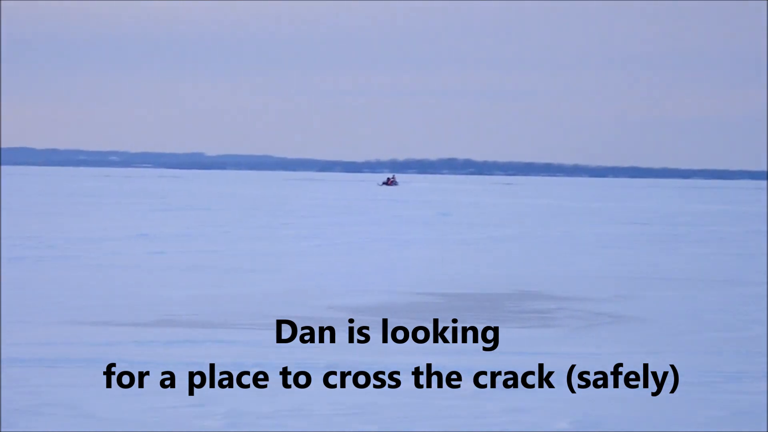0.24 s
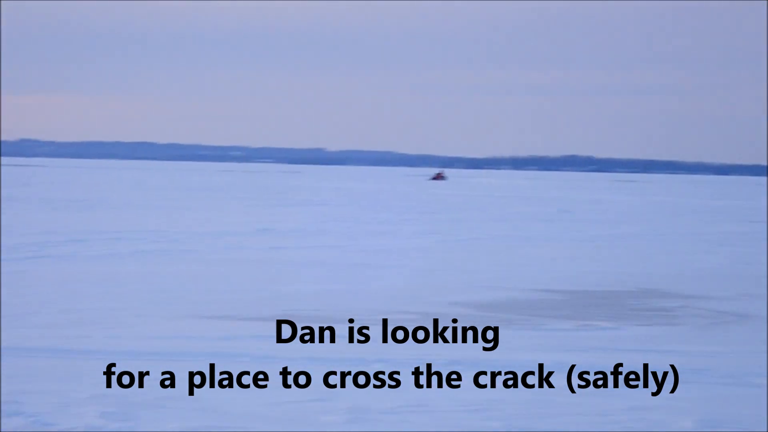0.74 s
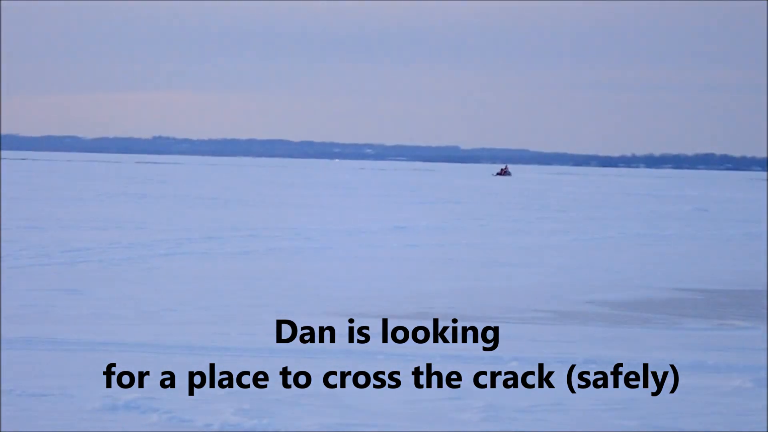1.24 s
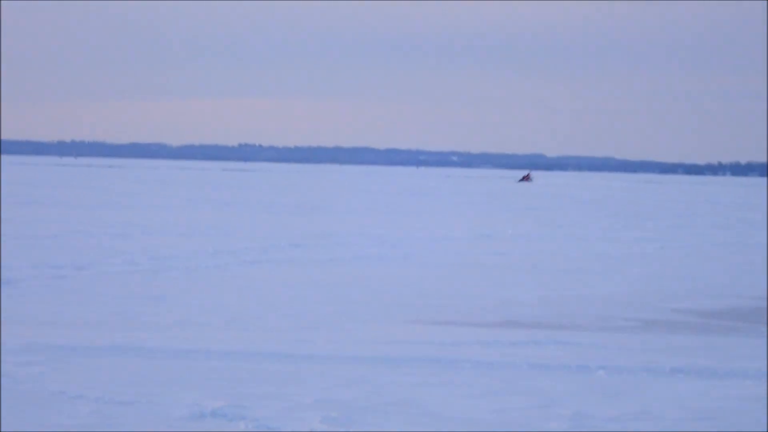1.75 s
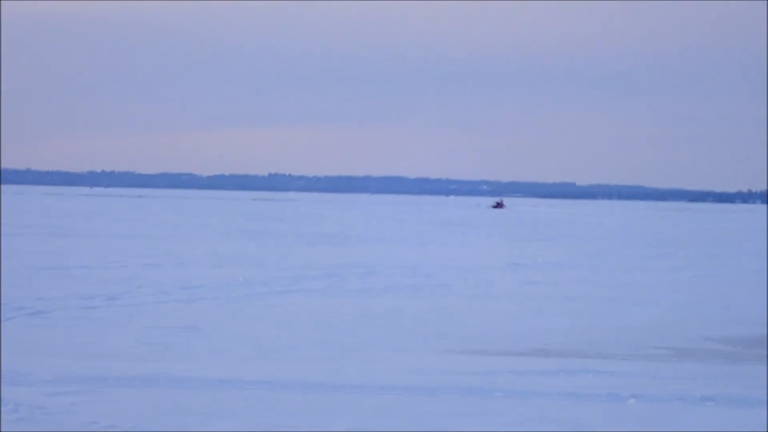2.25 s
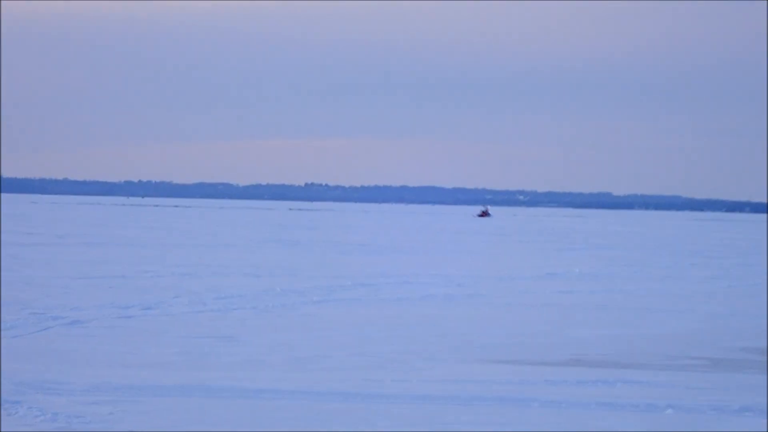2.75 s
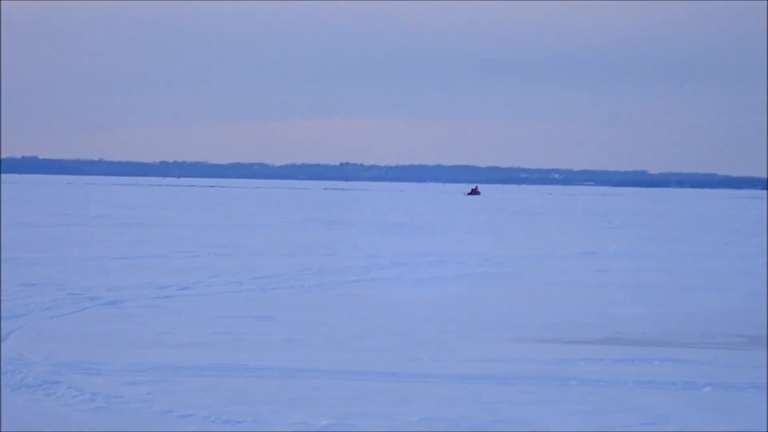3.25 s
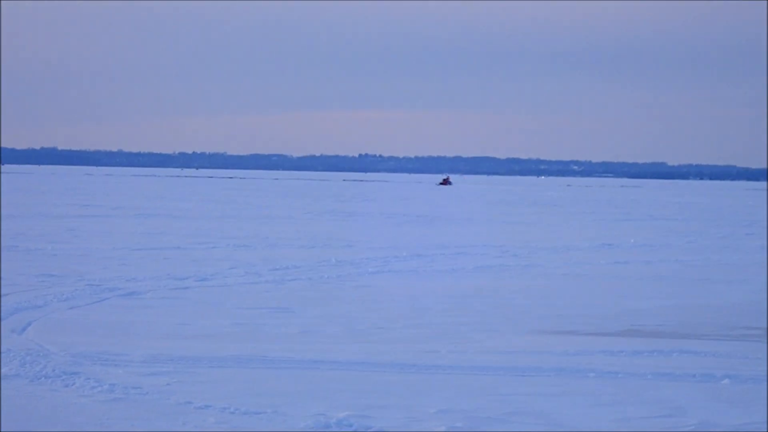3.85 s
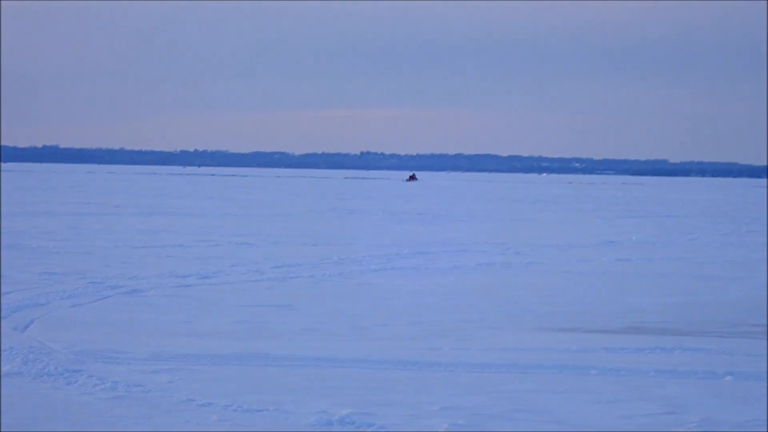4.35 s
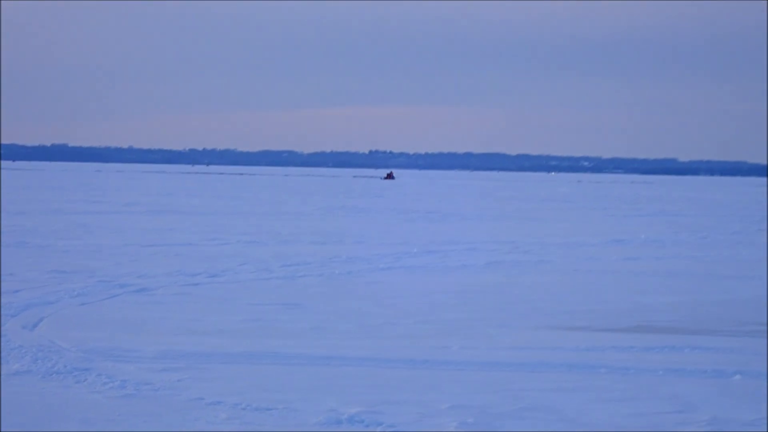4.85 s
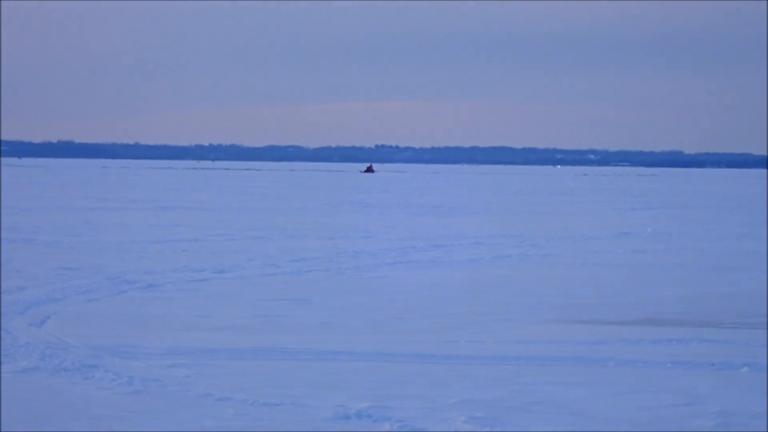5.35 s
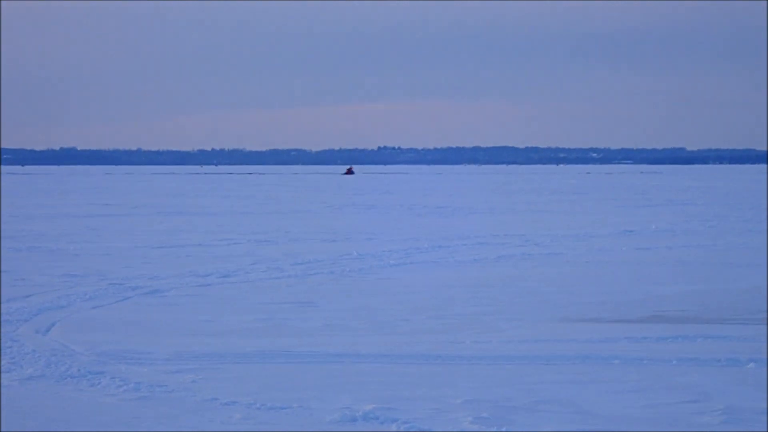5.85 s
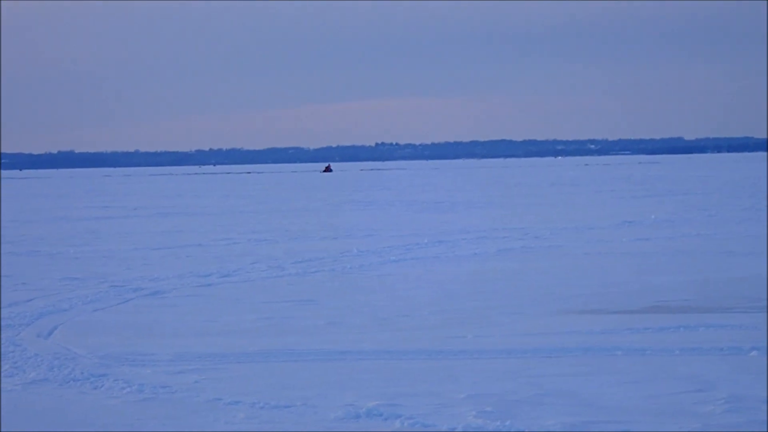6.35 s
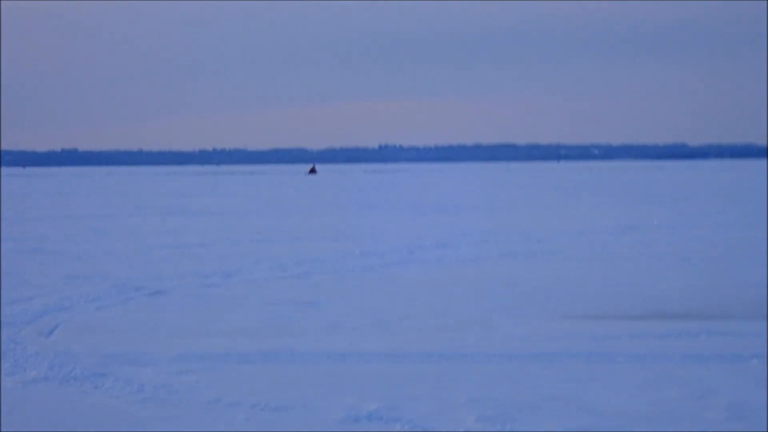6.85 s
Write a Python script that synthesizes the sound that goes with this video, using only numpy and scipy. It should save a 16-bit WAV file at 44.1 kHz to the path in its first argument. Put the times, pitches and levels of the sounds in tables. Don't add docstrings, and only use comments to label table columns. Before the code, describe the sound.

For the full seven seconds a two-stroke snowmobile engine idles close to a stereo microphone on open ice, slightly left of centre. It is already running at the start and never revs, moves away or stops. Rapid uneven pops, roughly two dozen a second, crack sharply from the exhaust, ringing the pipe and rattling the cowl; weaker puffs and coughs fall between them. Beneath lies a steady low drone with a buzzing hum near 117 Hz. Fan and intake hiss pulses over it, strongest at first, easing gradually until about 3.5 seconds, then holding. Low wind thumps bump the microphone from 0.2 to 0.9 seconds, again near 4.1, and more lightly around 6. Tiny dry ticks from dropped samples recur in bursts throughout, some sharper, as around 1.6, 2.6 and 4.9 seconds. The sound is dry, loud and close, ending with the idle still running.

```python
import sys
import numpy as np
from scipy import signal
from scipy.fft import rfft, irfft, next_fast_len
from scipy.io import wavfile
from scipy.ndimage import uniform_filter1d, map_coordinates

SR = 44100
rng = np.random.default_rng(int(sys.argv[2]) if len(sys.argv) > 2 else 0)


def voltage_ratio(decibels):
    exponent = np.asarray(decibels, float) / 20
    return 10 ** exponent


def int16_out(signal):
    q = np.round(np.clip(np.atleast_2d(signal).T, -1, 1) * 32767)
    wavfile.write(sys.argv[1], SR, q.astype(np.int16))


N = 312669

PORTS_HZ = 117.5
# time in seconds, turns so far.
CRANK_TURNS = [(.007, 0), (.5399, 21), (.9762, 38), (1.4933, 58), (1.8979, 74), (2.3338, 91), (2.8944, 113),
               (3.1513, 123), (3.6309, 142), (3.7042, 145), (5.0866, 200), (5.6454, 222), (6.0005, 236),
               (6.4042, 252), (6.5286, 257), (7.0814, 279)]


def unit(x):
    return x / np.sqrt(np.mean(x ** 2) + 1e-20)


def along(points, hz):
    f, v = np.transpose(points)
    return np.interp(np.log(hz + 1), np.log(f + 1), v)


def wobble(rate):
    knots = rng.standard_normal(int(N * rate / SR) + 4)
    return map_coordinates(knots, [np.arange(N) * rate / SR])


def filtered(x, response):
    m = next_fast_len(N + SR // 2)
    return irfft(rfft(x, m) * response(np.fft.rfftfreq(m, 1 / SR)), m)[..., :N]


def late(hz, ms):
    return np.exp(-2j * np.pi * hz * ms / 1000)


def resonance(hz, centre, width):
    return 1j * hz * width / (centre * centre - hz * hz + 1j * hz * width)


def rush(spectrum, gate=1, alike=None):
    # frequency in Hz, left-right likeness from 0 to 1.
    usual_likeness = [(60, 1), (150, 0.97), (1000, 0.99), (2000, 0.74), (4000, 1), (8000, 0.063)]
    likeness = usual_likeness if alike is None else alike
    shut = [(spectrum[0][0] * .7, -120), *spectrum, (spectrum[-1][0] * 1.4, -120)]

    def colour(hz):
        turn = np.arccos(np.clip(along(likeness, hz), -1, 1)) / 2
        return voltage_ratio(along(shut, hz)) * [np.cos(turn), np.sin(turn)]

    mid, side = filtered(gate * rng.standard_normal((2, N)), colour)
    return unit(np.array([mid + side, mid - side]))


def dying(blows, t60, rise):
    t = np.arange(SR // 5) / SR
    decay = voltage_ratio(-60 * t / t60) * (1 - np.exp(-t / rise))
    return np.abs(signal.fftconvolve(blows, decay)[:N])


def clock(turns):
    s, done = np.transpose(CRANK_TURNS)
    per_second = PORTS_HZ / 3
    return np.interp(turns, np.r_[-per_second, done, done[-1] + per_second], np.r_[s[0] - 1, s, s[-1] + 1])


def turns_at(s):
    turns = np.arange(-3, CRANK_TURNS[-1][1] + 4)
    return np.interp(s, clock(turns), turns)


def rich_waits(usual):
    # start in seconds, length in seconds, turns waited.
    spells = [(.16, 0, 2), (.363, 0, 2), (.643, 0, 1), (1.131, .104, 2), (1.364, 0, 2), (3.1, 0, 4),
              (3.353, .203, 2), (3.68, .05, 2), (4.459, 0, 4), (4.71, .1, 2), (5.24, 0, 2), (5.823, .05, 2),
              (6.227, .102, 2), (6.605, 0, 2), (6.729, 0, 2)]
    waits = [0]
    while sum(waits) < CRANK_TURNS[-1][1]:
        now = clock(sum(waits))
        inside = (w for s, length, w in spells if s - .01 < now < s + length + .01)
        waits.append(next(inside, usual))
    return waits


def burns():
    second_waits = [0, 5, 4, 4, 5, 5, 7, 5, 6, 4, 4, 2, 6, 4, 4, 3, 6, 3, 3, 6, 4, 5, 6, 3, 4, 11, 3, 5, 5,
                    4, 3, 5, 5, 8, 5, 4, 6, 5, 5, 4, 6, 5, 4, 6, 4, 5, 5, 7, 8, 5, 5, 3, 4, 6, 5, 6, 5]
    third_waits = [2, 4, 5, 3, 5, 5, 5, 4, 4, 9, 6, 6, 5, 5, 6, 4, 6, 6, 6, 7, 5, 7, 4, 7, 5, 6, 6, 7, 4, 3,
                   5, 5, 6, 7, 5, 4, 3, 5, 1, 5, 5, 8, 4, 5, 3, 6, 6, 3, 5, 6, 6, 7, 5, 6]
    # blast in dB, shock front in dB, dB lost when the next comes a turn early, ms late.
    full_burns = [
        (-5.5, -24.5, 6, 0.0088),
        (-6.5, -22, 3.5, 0.37),
        (-6.5, -29.5, 2.6, 0.35),
    ]
    # time in seconds, extra strength in dB.
    odd_burns = [(.285, 2), (.899, -3), (.473, 1), (1.493, 4.5), (1.678, -7), (1.797, -3.5), (2.334, -4),
                 (2.776, -10), (2.784, 3), (3.403, 4.5), (3.488, 2.5), (3.505, 0), (3.688, -3),
                 (3.855, -2.5), (4.014, -8), (4.156, -0.5), (4.517, 3.5), (4.727, 0.5), (4.76, 3.5),
                 (5.18, 0.5), (5.612, -9), (5.873, -11), (6.261, 5.5), (6.278, -7), (6.32, 2), (6.621, 0),
                 (6.729, 0.5)]
    rich_wait, lean_wait = 3, 5
    blast_follows, warms_db_per_s = 0.34, 0.24
    blast_scatter_db, shock_scatter_db = 0.73, -1.5

    blows, shocks = np.zeros((2, 3, N))
    odd_s, odd_db = np.transpose(odd_burns)
    cylinders = [(rich_waits(rich_wait), rich_wait), (second_waits, lean_wait), (third_waits, lean_wait)]
    for c, (waits, usual) in enumerate(cylinders):
        blast_db, shock_db, early_db, ms = full_burns[c]
        s = clock(np.cumsum(waits) + c / 3) + ms / 1000
        early = np.clip(usual - np.r_[waits[1:], usual], 0, None)
        odd = (np.abs(s[:, None] - odd_s) < .004) @ odd_db
        strength_db = odd - early_db * early ** 1.4 + warms_db_per_s * (s - N / SR / 2)
        chance = rng.standard_normal((len(s), 2))
        at = np.round(s * SR).astype(int)
        blows[c, at] = voltage_ratio(blast_db + blast_follows * strength_db + blast_scatter_db * chance[:, 0])
        shocks[c, at] = voltage_ratio(shock_db + strength_db + shock_scatter_db * chance[:, 1])
    return blows, shocks


def add_puffs(blows, shocks):
    # time in seconds, blast in dB.
    half_lit = [(.702, -11.5), (.737, -19), (1.105, -18), (1.847, -14), (2.163, -10.5), (2.546, -15.5),
                (2.851, -17), (2.911, -14), (2.98, -12.5), (3.006, -25), (3.168, -15), (3.194, -11.5),
                (3.797, -11), (3.989, -15), (4.986, -18), (5.223, -9.5), (5.88, -15.5), (5.942, -10.5),
                (6.068, -14), (6.303, -15), (6.746, -14.5), (6.814, -15.5), (6.964, -19)]
    front_db = -30.5
    for s, db in half_lit:
        port = round(3 * turns_at(s))
        at = port % 3, round(clock(port / 3) * SR)
        blows[at], shocks[at] = voltage_ratio(db), voltage_ratio(db + front_db)


def misfires(blows, angle, level_db=-29):
    port = np.floor(angle * 3 / (2 * np.pi)).astype(int)
    at = np.flatnonzero(np.diff(port)) + 1
    coughs = np.zeros((3, N))
    coughs[port[at] % 3, at] = voltage_ratio(level_db + 6 * rng.standard_normal(len(at)))
    no_burn_near = uniform_filter1d(blows.sum(0), size=199) < 1e-6
    return coughs * no_burn_near


def reflections(hz):
    # delay in ms, share of the blast, and so on for three returns.
    header_returns = [(3.31, 0.59, 11.85, 0.86, 24.02, -0.39), (3.68, 0.78, 12.4, 0.59, 23.4, 0.42),
                      (3.11, 0.82, 12.01, 0.99, 23.48, 0.43)]
    returns = [sum(share * late(hz, ms) for ms, share in np.reshape(row, (-1, 2))) for row in header_returns]
    return 1 + np.array(returns)


def exhaust(blows, blast_hz=1160, level_db=23.0):
    # mode in Hz, width in Hz, coupling to cylinders 1, 2 and 3.
    pipe_modes = [(135, 18, -1.67, 2.06, 1.51), (166, 19, 11.5, 6.01, 10.79), (202, 18, -0.89, 6.37, 6.74),
                  (232, 28, -4.04, -3.64, -5.07), (306, 104, 2.52, 1.27, 2.22),
                  (439, 76, 8.11, 3.21, 12.68), (468, 188, -6.89, -2.88, -7.86),
                  (620, 315, 2.47, 2.75, 2.31), (774, 21, 3.81, 4.3, 3.32), (903, 18, 0.79, -1.11, 4.84),
                  (1121, 49, -1.24, 0.58, -5.26), (1269, 45, -1.73, -7.43, -1.63),
                  (1695, 850, -1.48, -1.7, -1.67)]

    def pop(hz):
        modes = sum(np.c_[to] * c * w / (c * c - hz * hz + 1j * hz * w) for c, w, *to in pipe_modes)
        return (modes - reflections(hz)) * np.exp(-(hz / blast_hz) ** 2) * late(hz, .55)

    pops = voltage_ratio(level_db) * filtered(blows, pop).sum(0)
    return filtered(pops, lambda hz: hz ** 4 / (hz ** 4 + 70 ** 4))


def shock(shocks, level_db=21):
    # frequency in Hz, width in Hz, level in dB.
    outlet_modes = [(1630, 470, -1), (2433, 76, 3), (2474, 470, 3), (3725, 390, 16.5), (3790, 367, 16.5),
                    (5130, 880, -3)]

    def strike(hz):
        ring = sum((-1) ** k * voltage_ratio(db) * resonance(hz, c, w) for k, (c, w, db) in enumerate(outlet_modes))
        returns = 1 + 0.31 * (reflections(hz) - 1) + 0.04 * late(hz, 2.295)
        return ring * returns * late(hz, .55) / (1 + (hz / 4900) ** 6)

    front = filtered(shocks, strike).sum(0)
    return -voltage_ratio(level_db) * filtered(front, lambda hz: np.array([late(hz, 0), late(hz, .035)]))


def bark(blows, shell_hz=1723, width_hz=610, level_db=5.5):
    ring = lambda hz: resonance(hz, shell_hz, width_hz) ** 2 * late(hz, 0.49)
    return -voltage_ratio(level_db) * filtered(blows.sum(0) ** .5, ring)


def pumping(angle, lag=2.596, unsteady_db=1):
    port_tones = {3: -28, 4: -29.5, 5: -25.5, 6: -26.5, 9: -35, 21: -43}
    angle = angle - 2 * np.pi * PORTS_HZ / 3 * .0006
    tones = (voltage_ratio(db + unsteady_db * wobble(13)) * np.cos(k * angle - lag) for k, db in port_tones.items())
    return np.sqrt(2) * sum(tones)


def cowl(blows, shocks):
    # frequency in Hz, hiss density in dB per Hz.
    hiss_colour = [(1300, -14), (1800, 0), (2300, -8), (3000, -10), (3750, -3), (4300, -16), (6400, -14),
                   (9000, -36)]
    # frequency in Hz, rattle density in dB per Hz.
    rattle_colour = [(120, -35), (200, -41), (275, -24), (345, -7), (392, -5.5), (450, 11), (545, -31),
                     (620, -7), (870, 2), (1250, 2.5), (1480, -6.5), (1800, -8.5), (2100, -17)]
    fronts = shocks.sum(0)
    burst = dying(fronts, t60=.025, rise=.0004)
    tail = .12 * dying(fronts, t60=.1, rise=.002)
    hiss = rush(hiss_colour, burst + tail)
    shaking = dying(blows.sum(0), t60=0.047, rise=0.027) * voltage_ratio(1.0 * wobble(90))
    return voltage_ratio(-49) * hiss + voltage_ratio(-29) * rush(rattle_colour, shaking)


def drone():
    # frequency in Hz, density in dB per Hz.
    drone_colour = [(53, -26), (90, -16.5), (199, -1.5), (248, -9.5), (286, -17), (347, -12.5), (393, -15),
                    (458, -11.5), (667, -18.5), (857, -14.5), (1250, -20), (2500, -48.5), (3250, -77),
                    (5500, -120)]
    return voltage_ratio(-24.0) * rush(drone_colour, voltage_ratio(0.4 * wobble(18)))


def fan(angle):
    # frequency in Hz, density in dB per Hz.
    fan_colour = [(1290, -29), (2200, -13), (3130, -8), (3740, -8.5), (4780, -13), (6420, 2.5),
                  (7530, -6.5), (8990, -3.5), (10600, -17.5), (15200, -15), (16100, -39), (16500, -53)]
    # time in seconds, fan level in dB.
    fan_level = [
        (0.0, -49),
        (3.49, -51.5),
        (7.09, -51.5),
    ]
    level_db = np.interp(np.arange(N) / SR, *np.transpose(fan_level)) + 0.5
    pulse_db = 1.5 * np.cos(3 * angle) + 2 * wobble(30)
    return voltage_ratio(level_db) * rush(fan_colour, voltage_ratio(pulse_db))


def wind():
    # frequency in Hz, density in dB per Hz.
    buffet_colour = [(20, 1), (40, -12.5), (70, -1), (110, -1), (200, -36)]
    # gust time in seconds, peak in dB.
    gust_peaks = [(.18, -29), (.55, -25), (.71, -32), (.87, -28), (1.5, -35), (3.07, -38), (4.07, -27),
                  (4.19, -25), (5.95, -30), (6.23, -34), (6.5, -35)]
    t = np.arange(N) / SR
    strength = voltage_ratio(-46) + sum(voltage_ratio(db) * np.exp(-((t - s) / .03) ** 2) for s, db in gust_peaks)
    return strength * rush(buffet_colour, alike=[(30, .4), (100, 0.43)])


def scene():
    blows, shocks = burns()
    add_puffs(blows, shocks)
    angle = 2 * np.pi * turns_at(np.arange(N) / SR)
    pops = exhaust(blows + misfires(blows, angle))
    engine = pops + bark(blows) + pumping(angle) + shock(shocks) + cowl(blows, shocks)
    left, right = engine + drone() + fan(angle) + wind()
    return voltage_ratio([[.6], [-.6]]) * np.array([left, np.r_[0, right[:-1]]])


def joints():
    frame, beat = 1472, .53
    first_joint, slip, frames_per_slip = 52, 10 / 3, 50 / 3
    k = np.arange(N // frame)
    phase = k * beat % 1
    k = k[(phase > .605) & (phase < .935)]
    slips = np.round(k / frames_per_slip - .55)
    return frame * k + np.round(first_joint - slip * slips).astype(int)


def dropped_samples(held):
    # time in seconds, tick level in dB.
    deep_ticks = [(.235, -20), (.735, -17), (.868, -11), (1.002, -9.5), (1.235, -16), (1.302, -17),
                  (1.369, -11.5), (1.569, -3.5), (1.87, -11), (2.137, -18), (2.437, -15.5), (2.569, -7.5),
                  (2.637, -11.5), (3.071, -15.5), (3.138, -13.5), (3.505, -9), (3.571, -16), (3.638, -18),
                  (4.206, -17), (4.706, -10.5), (4.773, -15), (4.907, -8), (5.14, -14.5), (5.34, -10),
                  (5.408, -17), (5.908, -14.5), (5.975, -15), (6.275, -13), (6.475, -12.5), (6.976, -15)]
    shallow_db = -21.5
    at = joints()
    depth = voltage_ratio(shallow_db) * np.tanh(held[0, at] / .15)
    for s, db in deep_ticks:
        near = np.argmin(np.abs(at - s * SR))
        depth[near] = voltage_ratio(db) * np.sign(depth[near])
    dips = np.zeros(N)
    dips[at] = depth
    return voltage_ratio([[.6], [-.6]]) * dips


def roll_off(x):
    return signal.sosfilt(signal.butter(12, 16670, fs=SR, output="sos"), x)


def record(dry):
    cut = filtered(dry, lambda hz: (1j * hz / (22 + 1j * hz)) ** 2)
    held = cut / (1 + np.abs(cut / .95) ** 6) ** (1 / 6)
    ticking = held - dropped_samples(held)
    banded = filtered(ticking, lambda hz: voltage_ratio(along([(15600, 0.5), (16600, -35)], hz)))
    return roll_off(banded)


dry = scene()
out = record(dry)
int16_out(out)
```